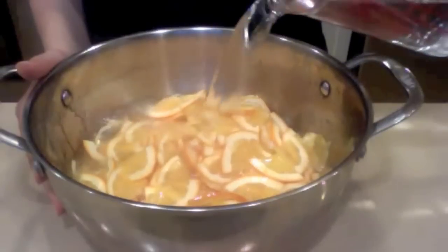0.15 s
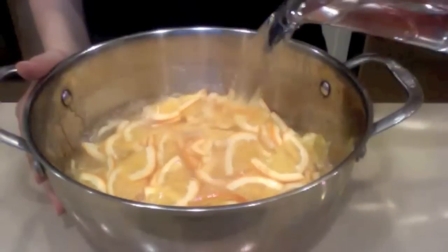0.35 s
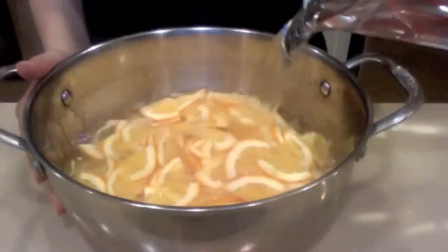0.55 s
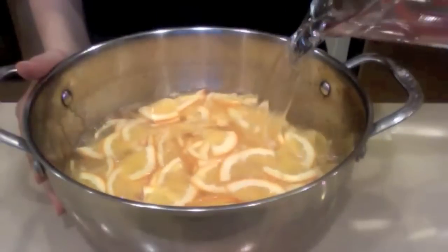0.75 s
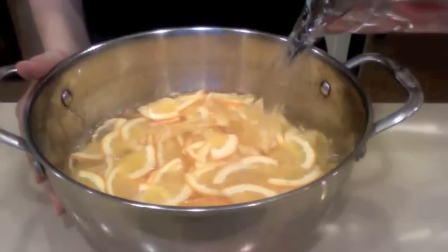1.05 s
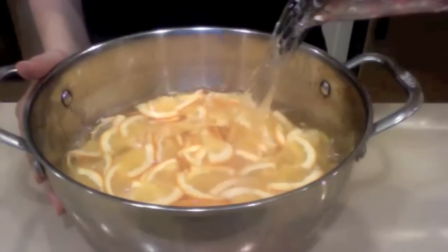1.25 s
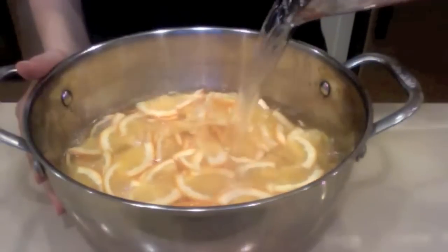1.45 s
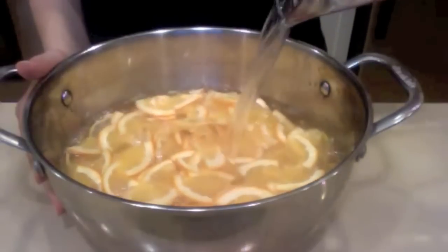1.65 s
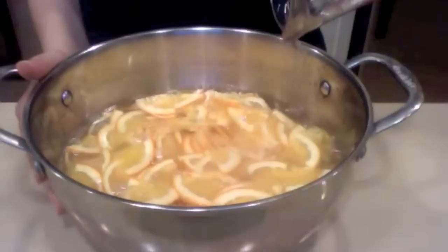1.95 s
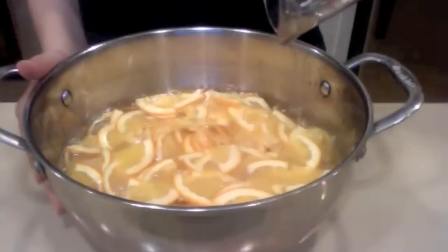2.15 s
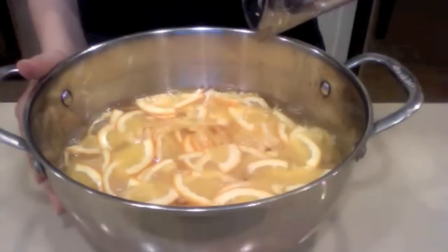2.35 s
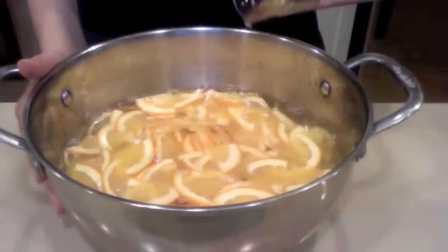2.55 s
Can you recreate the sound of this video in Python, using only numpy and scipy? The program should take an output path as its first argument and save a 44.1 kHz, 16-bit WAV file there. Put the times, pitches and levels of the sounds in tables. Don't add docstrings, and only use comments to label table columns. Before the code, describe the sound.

Close, slightly dull small-microphone sound of water trickling into a fruit-filled metal pot in a kitchen; the stream thins, surges with crowded plops and fine spray, then ends with tiny drips over fading appliance noise.

```python
import sys
import numpy as np
from scipy import signal
from scipy.fft import rfft, irfft, next_fast_len
from scipy.io import wavfile
from scipy.ndimage import uniform_filter1d, map_coordinates

SR = 44100
rng = np.random.default_rng(int(sys.argv[2]) if len(sys.argv) > 2 else 0)


def volts_from_decibels(level):
    exponent = np.asarray(level, float) / 20
    return 10 ** exponent


def waveform_to_disk(signal):
    frames = np.transpose(np.atleast_2d(signal))
    scaled = np.clip(frames, -1, 1) * 32767
    samples = np.round(scaled).astype(np.int16)
    wavfile.write(sys.argv[1], SR, samples)


N = 119070


def unit(x):
    return x / np.sqrt(np.mean(x ** 2) + 1e-20)


def curves(rows):
    s, *columns = np.transpose(rows)
    return [np.interp(np.arange(N) / SR, s, column) for column in columns]


def wobble(rate_hz, size=N):
    knots = rng.standard_normal(int(size * rate_hz / SR) + 4)
    return map_coordinates(knots, [np.arange(size) * rate_hz / SR])


def coloured(x, response):
    size = next_fast_len(N + 8192)
    return irfft(rfft(x, size) * response(np.fft.rfftfreq(size, 1 / SR)), size)[:N]


def shape(points):
    point_hz, db = np.transpose(points)
    return lambda hz: volts_from_decibels(np.interp(np.log(hz + 1), np.log(point_hz + 1), db))


def rush(points, patchy_db):
    z = signal.stft(rng.standard_normal(N + 512), nperseg=256)[2]
    field = uniform_filter1d(rng.standard_normal(z.shape), 5, 0)
    field = uniform_filter1d(field, 5, 1)
    noise = signal.istft(z * volts_from_decibels(patchy_db * unit(field)), nperseg=256)[1][:N]
    return unit(coloured(noise, shape(points)))


def bubbles(s, db, hz, lives):
    rise_s, fall_s, glide = 0.0017, 0.0016, 0.002
    t = np.arange(-200, 600) / SR
    scale = (lives * (hz / 4000) ** -0.28)[:, None]
    swell = np.exp(-(t / (rise_s * scale)) ** 2)
    decay = np.exp(-np.abs(t) / (fall_s * scale))
    env = np.where(t < 0, swell, decay)
    env = env * np.sin(np.pi * np.arange(len(t)) / len(t)) ** 0.5
    tone = np.sin(2 * np.pi * hz[:, None] * (t + glide * t * t / (2 * fall_s * scale)))
    at = np.round(s * SR).astype(int)[:, None] + np.round(t * SR).astype(int) + SR
    rings = volts_from_decibels(db)[:, None] * env * tone
    return np.bincount(at.ravel(), rings.ravel(), N + 2 * SR)[SR:SR + N]


# peak time in seconds,
# peak level in dB, pitch in Hz.
LARGE_POCKETS = [(0.187, -32, 2180), (0.2649, -27.5, 2050), (0.3092, -27, 2880), (0.3698, -32, 1440),
                 (0.642, -27, 2470), (1.2458, -28, 2720), (1.2487, -28.5, 1800.0), (1.4844, -17, 2960.0),
                 (1.5016, -24.5, 3080), (1.5378, -24.5, 2450), (1.5555, -23, 2470), (1.6149, -13.5, 3070),
                 (1.6372, -23, 1880), (1.6527, -29.5, 1850.0), (1.6834, -18.5, 2810), (1.6953, -22.5, 2470),
                 (1.7165, -20.5, 2910), (1.8295, -29.5, 1880), (1.8413, -20.5, 1983), (1.9712, -39, 1210)]
MIDDLE_POCKETS = [(0.27, -17.5, 4290), (0.309, -18.5, 4340), (0.4705, -22, 4180), (0.5365, -24, 4240),
                  (0.545, -25.5, 4320), (0.5937, -18, 4220), (0.6258, -21.5, 4060), (0.6844, -24.5, 4300),
                  (0.878, -18, 3770), (1.1877, -19, 4230), (1.2375, -24, 3670), (1.305, -27, 4000),
                  (1.3175, -17, 4330), (1.3227, -19, 3650), (1.356, -26, 4260), (1.4357, -20.5, 3680),
                  (1.4432, -17, 3840), (1.5215, -23, 4680), (1.5295, -21.5, 4070), (1.574, -25, 4240),
                  (1.61, -14, 3664), (1.625, -15.5, 3520), (1.626, -22, 4380), (1.6833, -22, 4520),
                  (1.7224, -19, 4000), (1.758, -17, 3750), (1.8304, -18, 3760), (1.877, -7.5, 3705),
                  (1.9117, -30, 3420), (1.967, -21.5, 4700), (1.9695, -21, 4200), (1.972, -23, 4570)]
SMALL_POCKETS = [(0.1134, -21, 5090), (0.1224, -21, 6520), (0.2643, -26, 6700), (0.3827, -17, 5870),
                 (0.4734, -14, 5130), (0.9664, -25, 6690), (1.0254, -21, 5680), (1.1607, -19, 5060),
                 (1.1997, -22.5, 5660), (1.2015, -23, 5070), (.125, -24, 5960), (.542, -25, 4930),
                 (1.3064, -23.5, 4910), (1.4562, -23.5, 5000), (1.5041, -24, 7200), (1.5275, -14.5, 5560.0),
                 (1.5535, -18.5, 5870), (1.5974, -23, 6820), (1.612, -23, 5350), (1.6262, -16.5, 6390),
                 (1.6725, -22.5, 5660), (1.6932, -23, 4800), (1.7206, -23, 5580), (1.8295, -21, 7000),
                 (1.8298, -29, 4960.0), (1.852, -19.5, 6070), (1.8922, -25, 4920), (1.9367, -25.5, 5460)]
SPRAY_POCKETS = [(0.0389, -36, 13400), (0.0384, -34.5, 9400), (0.098, -30.5, 10260), (0.1646, -30.5, 8630),
                 (0.236, -35, 9180), (0.4161, -34, 10470), (0.5019, -26, 8570.0), (0.846, -33, 7760),
                 (0.8573, -29, 7760), (0.967, -37.5, 10320.0), (1.166, -37, 10200), (1.4741, -29, 8000),
                 (1.489, -34, 10400), (1.5492, -42, 13100), (1.569, -27, 7650), (1.5974, -32.0, 8300),
                 (1.764, -38, 13100), (1.764, -30, 10800), (1.766, -30.5, 9430), (1.781, -35, 12800),
                 (1.8044, -40, 10640), (1.82, -37, 10200), (1.775, -33, 10500), (1.561, -38, 12500),
                 (1.72, -43, 11200), (.283, -45, 12500)]
MIXED_POCKETS = [(.009, -30.5, 3460), (0.183, -24.5, 3510), (.551, -25, 4300), (0.632, -28, 6600),
                 (.8, -32.5, 6950), (0.9, -30, 3810), (1.008, -28.5, 5100), (1.096, -28.5, 4350),
                 (1.178, -22.5, 3570), (1.346, -24.5, 3670), (1.416, -26.5, 4300), (1.872, -19, 3770),
                 (1.881, -16, 3560), (1.886, -13, 3750), (1.89, -19, 3520), (1.9025, -30, 3470),
                 (1.98, -29, 4300), (2.104, -41.5, 5460), (2.345, -36, 3600),
                 (.0757, -42, 9100), (.148, -34, 7550), (.1915, -34, 8120), (0.2677, -34, 7710),
                 (.416, -33.5, 9630), (0.483, -30, 4300), (0.528, -33, 6100), (.538, -27.5, 5050),
                 (0.553, -29, 5560), (.5765, -41, 7760), (.604, -26, 3800), (0.632, -28, 5500),
                 (.7265, -39, 5600), (0.883, -25.5, 3750), (.9665, -34, 7600), (1.075, -35, 4500),
                 (1.087, -43, 13500), (1.124, -42, 10200), (1.132, -48, 10200), (1.139, -30.5, 5870),
                 (1.154, -42, 10400), (1.165, -36, 7630), (1.21, -39, 11000), (1.2105, -40, 8200),
                 (1.224, -38, 11450), (1.2325, -22, 3640), (1.325, -24, 4300), (1.332, -34, 3920),
                 (1.352, -31, 5830), (1.3515, -29, 4300), (1.37, -31, 3900), (1.428, -31, 3640),
                 (1.472, -27, 5100), (1.5, -28, 4000), (1.54, -25, 4100), (1.561, -30, 5900),
                 (1.568, -31, 6100), (1.6, -30.5, 1890), (1.611, -26, 5930), (1.6195, -19.5, 3340),
                 (1.634, -25, 3300), (1.639, -33, 6340), (1.652, -43, 8700), (1.68, -27.5, 5700),
                 (1.693, -25, 4000), (1.7274, -33, 3780), (1.736, -32, 5800), (1.766, -34, 3500),
                 (1.7815, -33, 5900), (1.8035, -27, 5960), (1.812, -34, 6300), (1.837, -33, 6900),
                 (1.8536, -27.5, 6840), (1.886, -27, 5020), (1.9255, -34, 5040), (1.9367, -32, 6600),
                 (1.949, -26, 4970)]


def pockets(count=5):
    mate_db, mate_early_s, mate_late_s, mate_detune = -12.5, 0.001, 0.018, 0.098
    rows = LARGE_POCKETS + MIDDLE_POCKETS + SMALL_POCKETS + SPRAY_POCKETS + MIXED_POCKETS
    s, db, hz = np.transpose(rows)
    u = rng.random((len(s), count))
    g = rng.standard_normal((len(s), count, 3))
    mates_s = s[:, None] - mate_early_s + (mate_early_s + mate_late_s) * u
    mates_db = db[:, None] + mate_db + 3 * np.tanh(g[..., 0])
    mates_hz = hz[:, None] * np.exp(mate_detune * g[..., 1])
    mate_lives = 0.6 * np.exp(0.2 * g[..., 2])
    mates = bubbles(mates_s.ravel(), mates_db.ravel(), mates_hz.ravel(), mate_lives.ravel())
    mains = bubbles(s, db + 3, hz, lives=np.exp(0.12 * g[:, 0, 2]))
    tremble = volts_from_decibels(3.5 * np.tanh(wobble(900)))
    ragged = volts_from_decibels(3 * np.tanh(wobble(500)))
    return mains * tremble + mates * ragged


# start in seconds, peak level in dB, centre in Hz.
SLAP_EVENTS = [(.0378, -53, 11000), (0.311, -29, 3320), (.4145, -44, 10000), (0.498, -42, 8450),
               (0.965, -40, 11100), (1.023, -45, 9000), (1.472, -25.5, 7400), (1.4868, -30, 9400),
               (1.527, -33.5, 8500), (1.549, -35, 11500), (1.595, -38, 9000), (1.625, -34, 8500),
               (1.65, -40, 11100), (1.764, -31.5, 11300), (1.8287, -20, 5500), (1.924, -41, 6500),
               (1.9657, -22.5, 3980), (1.9692, -29, 2000), (1.9702, -32, 900)]


def slaps():
    rise_s, t60_s, octaves = 0.00046, 0.024, 0.5
    out, t = np.zeros(N), np.arange(SR // 20) / SR
    bins_hz = np.fft.rfftfreq(len(t), 1 / SR)
    for s, db, hz in SLAP_EVENTS:
        band = np.exp(-(np.log2((bins_hz + 1) / hz) / octaves) ** 2)
        noise = unit(irfft(rfft(rng.standard_normal(len(t))) * band, len(t)))
        env = volts_from_decibels(db - 60 * t / t60_s) * (1 - np.exp(-(t / rise_s) ** 2))
        out[round(s * SR):][:len(t)] += env * noise
    return out


# time in seconds, flow level in dB, spray share in dB.
POUR = [(0, -39, 2), (.62, -42, -1.5), (.75, -46, -4), (1.05, -46, -2), (1.22, -43, 3), (1.42, -42.5, -5),
        (1.48, -37, 4), (1.66, -36.5, 3.5), (1.74, -39.5, -1.5), (1.8, -38.5, 2.5), (1.97, -42, -6),
        (2.03, -50, -9.5), (2.25, -50.5, -3), (2.7, -62, 1)]
# frequency in Hz, density in dB per Hz.
WASH_SPECTRUM = [
    (880, -7),
    (1500, -2),
    (2230, -10),
    (2400, -4),
    (3640, -4),
    (4720, -11),
    (5610, -8.5),
    (13200, -35.5),
    (15000, -52),
]
DENSER = 0.8


def stream():
    flow_db, spray_db = curves(POUR)
    size = volts_from_decibels(flow_db - DENSER / 2 * (flow_db - flow_db.mean()))
    body = volts_from_decibels(-2) * swarm(flow_db, hz=4300, spread=0.41, count=2200)
    spray = volts_from_decibels(-7 + spray_db) * swarm(flow_db + spray_db, hz=9500, spread=0.334, count=1800)
    mist = rush([(4500, -50), (7000, -7), (14000, -5), (15500, -16)], patchy_db=4.5)
    mist = volts_from_decibels(-19 + spray_db) * mist
    wash = volts_from_decibels(-3.5) * rush(WASH_SPECTRUM, patchy_db=2.0)
    surge = volts_from_decibels(1.2 * wobble(25))
    return size * (body + spray), volts_from_decibels(flow_db) * surge * (mist + wash)


def swarm(flow_db, hz, spread, count):
    stream_ends_s, size_spread_db = 1.99, 5.5
    u, g = rng.random((count, 2)), rng.standard_normal((count, 2))
    pouring = np.arange(N) < stream_ends_s * SR
    share = np.cumsum(volts_from_decibels(DENSER * flow_db + 5 * wobble(18)) * pouring)
    s = np.interp(u[:, 0], share / share[-1], np.arange(N) / SR)
    pitch_hz = np.clip(hz * np.exp(spread * g[:, 0]), 900, 14000)
    size_db = -size_spread_db * np.log(1 - 0.88 * u[:, 1])
    size_db = size_db + 20 * np.log10(shape(WASH_SPECTRUM)(pitch_hz))
    return unit(bubbles(s, size_db, pitch_hz, lives=0.6 * np.exp(0.3 * g[:, 1])))


def echoes(x):
    pot_db, pot_t60_s, room_db, room_t60_s, flutter_db = -10, 0.038, -14, 0.28, 5
    t, step = np.arange(SR // 4) / SR, 1764
    out, fade = np.zeros(N + SR), np.hanning(2 * step)
    padded = np.pad(x * volts_from_decibels(4.9 * wobble(250)), (step, 2 * step))
    for k in range(0, N, step):
        flutter = flutter_db * wobble(290, size=len(t))
        pot = rng.standard_normal(len(t)) * volts_from_decibels(flutter - 60 * t / pot_t60_s) * (t > 0.003)
        room = rng.standard_normal(len(t)) * volts_from_decibels(-60 * t / room_t60_s) * (t > 0.008)
        tail = volts_from_decibels(pot_db) * pot / np.linalg.norm(pot) + volts_from_decibels(room_db) * room / np.linalg.norm(room)
        out[k:k + 2 * step + len(t) - 1] += signal.fftconvolve(fade * padded[k:k + 2 * step], tail)
    return out[step:step + N]


# time in seconds, level in dB.
KITCHEN_LEVEL = [
    (0, -44.5),
    (1.98, -44),
    (2.7, -50),
]
# frequency in Hz, density in dB per Hz.
AIR_SPECTRUM = [
    (40, -31),
    (120, -6),
    (300, -6.5),
    (900, -6),
    (1700, -7.5),
    (2350, -15.5),
    (3400, -11),
    (6000, -35.5),
    (14500, -45),
    (15500, -56),
]


def kitchen():
    hum_hz, hum_width_hz, hum_db = 273.4, 14.6, -13
    level_db, = curves(KITCHEN_LEVEL)
    hum = coloured(rng.standard_normal(N), lambda hz: 1 / (1 + ((hz - hum_hz) / hum_width_hz) ** 2))
    return volts_from_decibels(level_db) * (rush(AIR_SPECTRUM, patchy_db=-0.36) + volts_from_decibels(hum_db) * unit(hum))


def scene():
    small, wash = stream()
    drops = pockets() + slaps() + small
    return (drops + echoes(drops) + wash + kitchen())[None]


def top_cut(x):
    return signal.sosfilt(signal.butter(12, 15690, fs=SR, output="sos"), x)


def record(dry):
    low_cut_hz, droop_hz, top_hz = 81.5, 13400, 15800

    def microphone(hz):
        return (hz < top_hz) / (1 + (low_cut_hz / (hz + 1)) ** 4) / (1 + (hz / droop_hz) ** 12)

    mix = coloured(dry[0], microphone)[None]
    return top_cut(mix)


dry = scene()
out = record(dry)
waveform_to_disk(out)
```